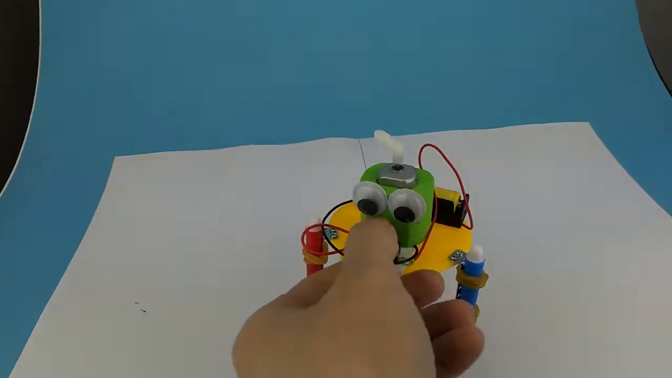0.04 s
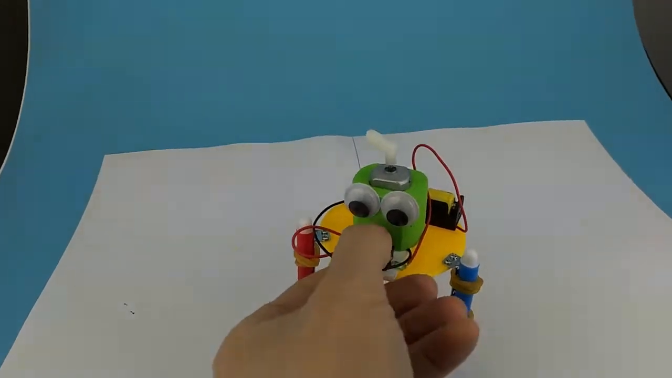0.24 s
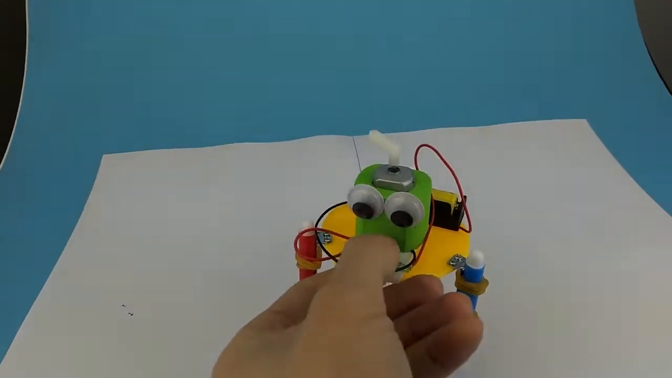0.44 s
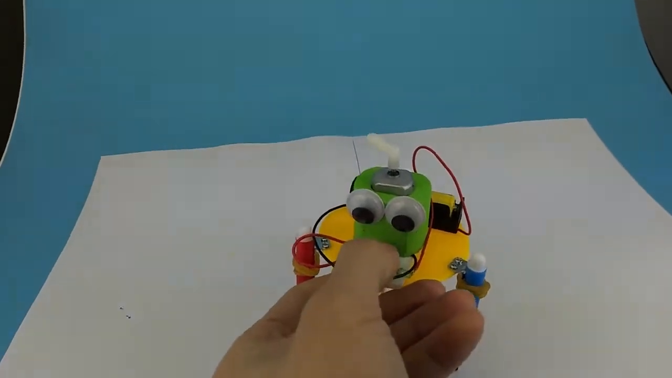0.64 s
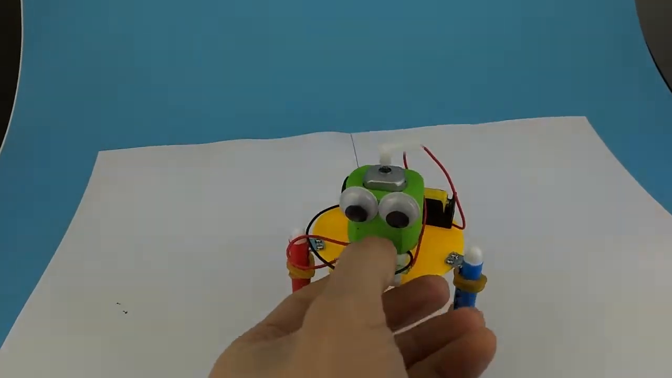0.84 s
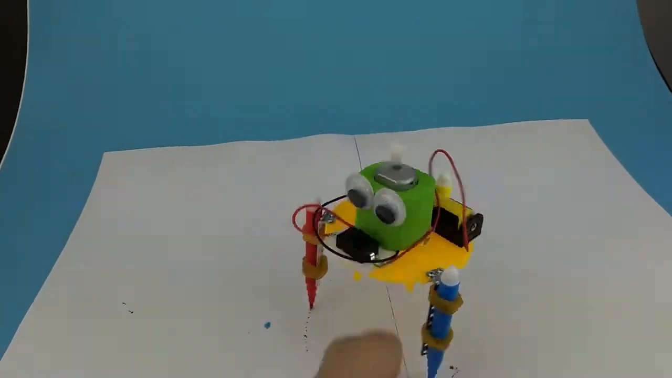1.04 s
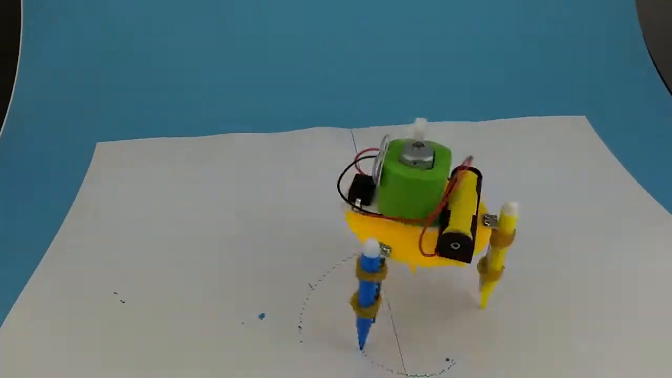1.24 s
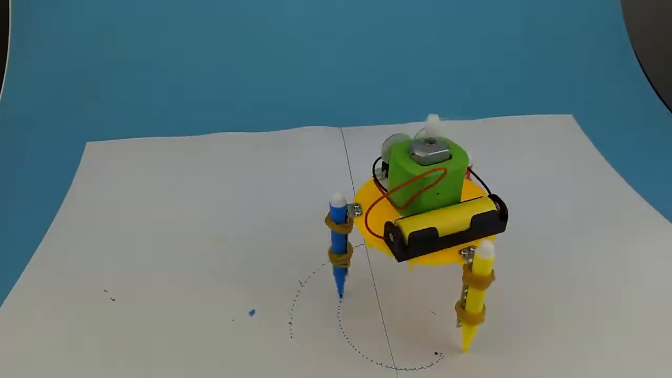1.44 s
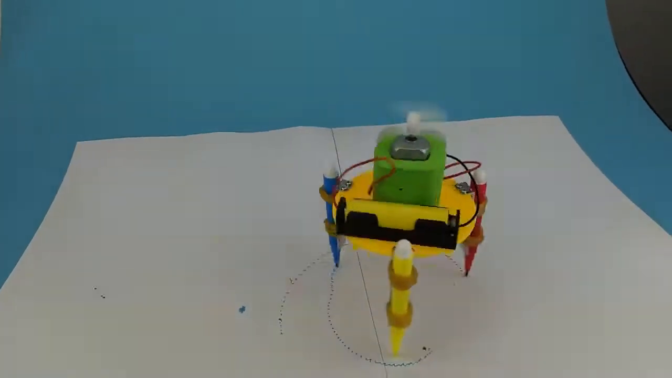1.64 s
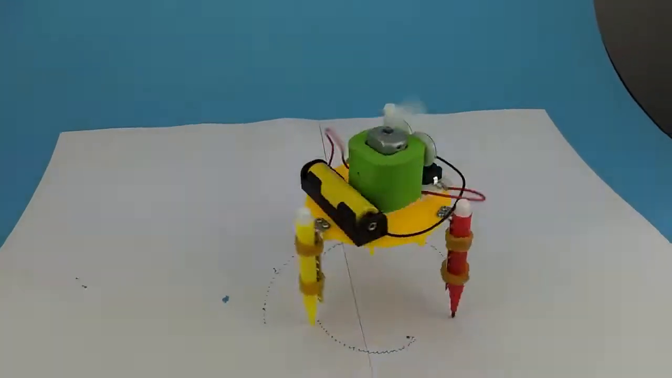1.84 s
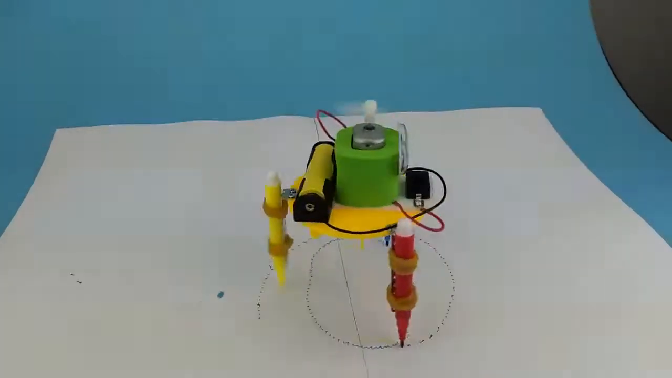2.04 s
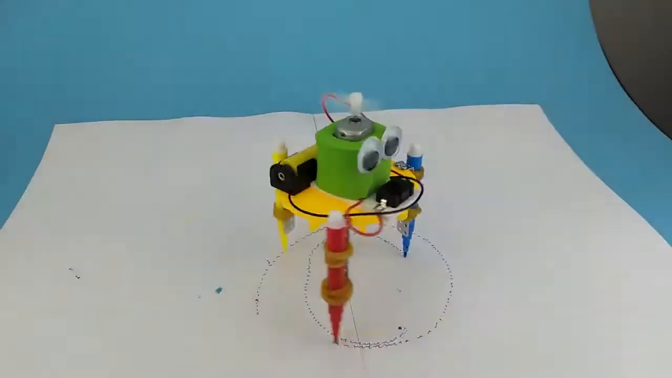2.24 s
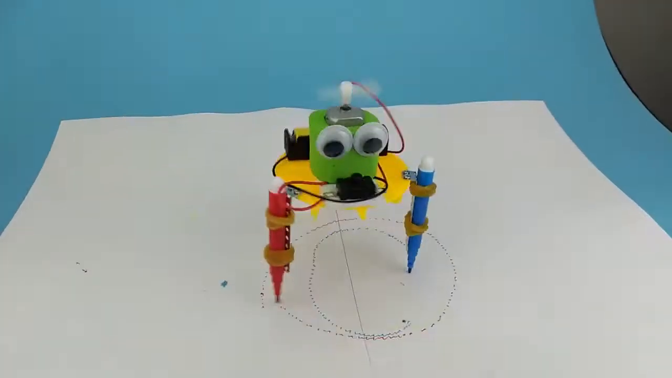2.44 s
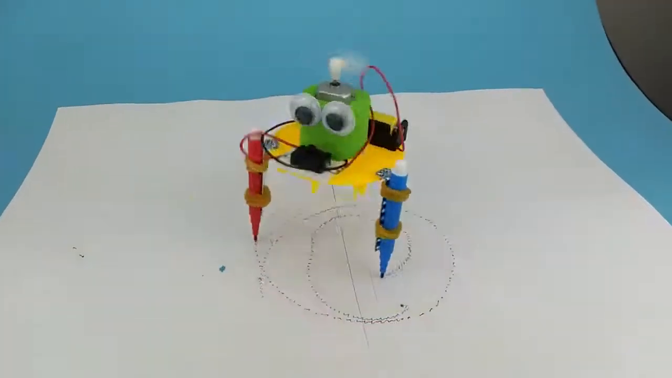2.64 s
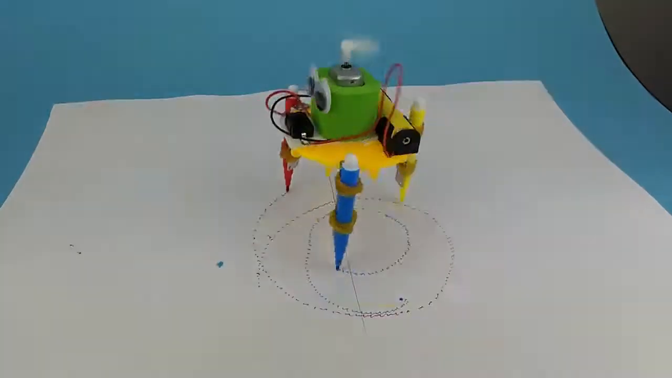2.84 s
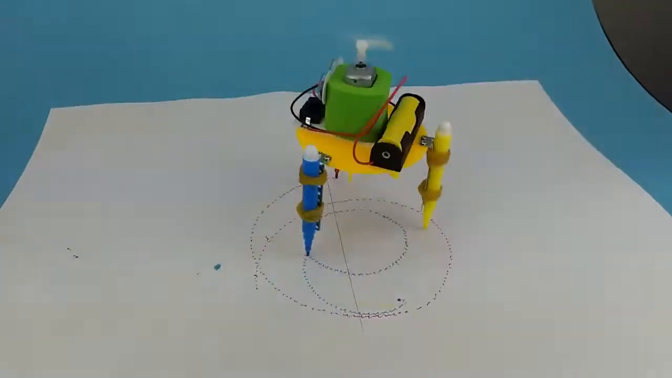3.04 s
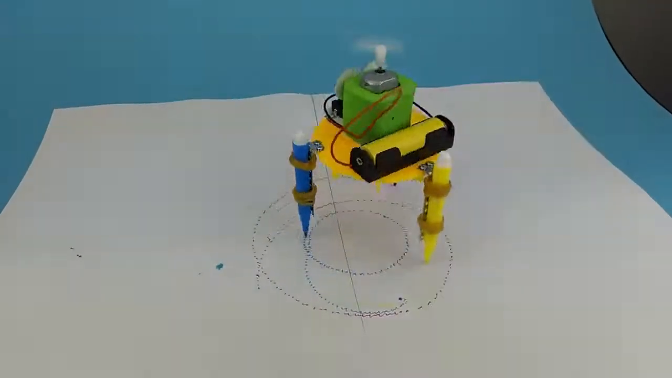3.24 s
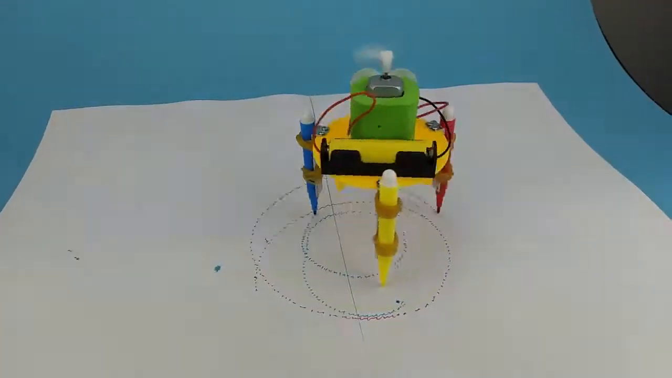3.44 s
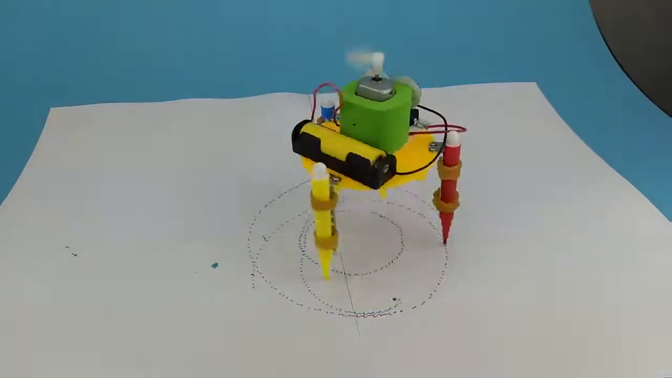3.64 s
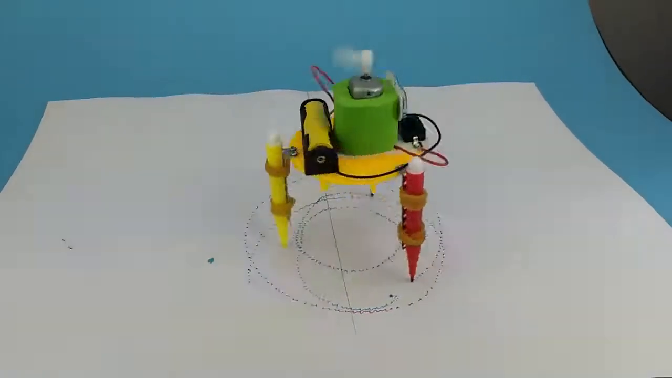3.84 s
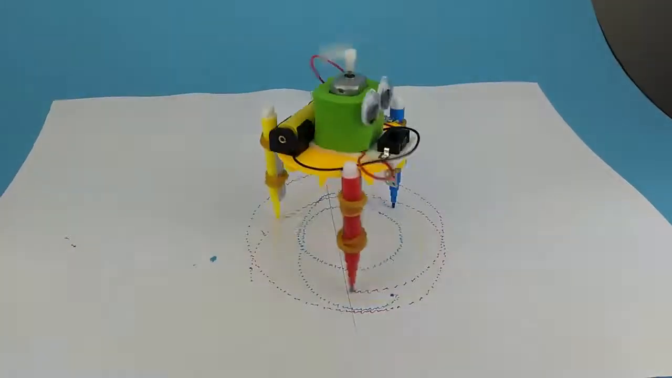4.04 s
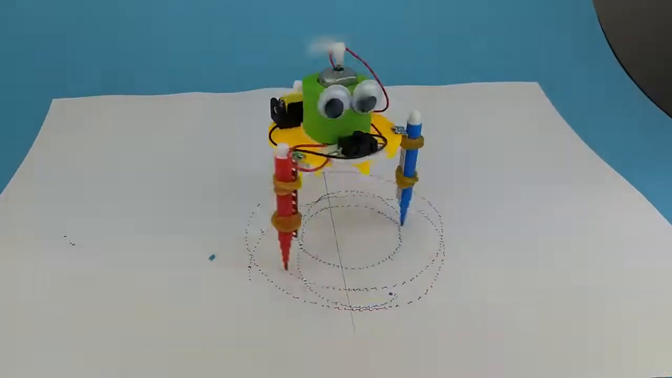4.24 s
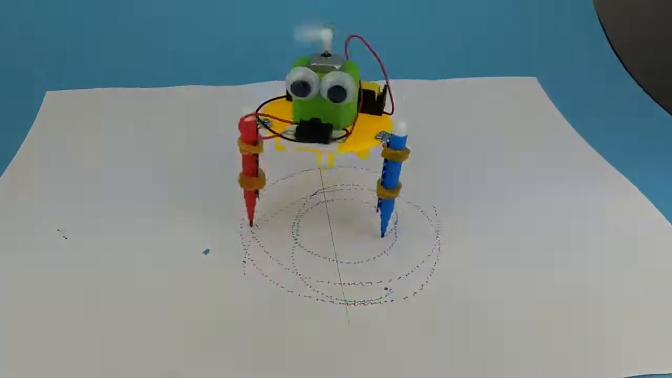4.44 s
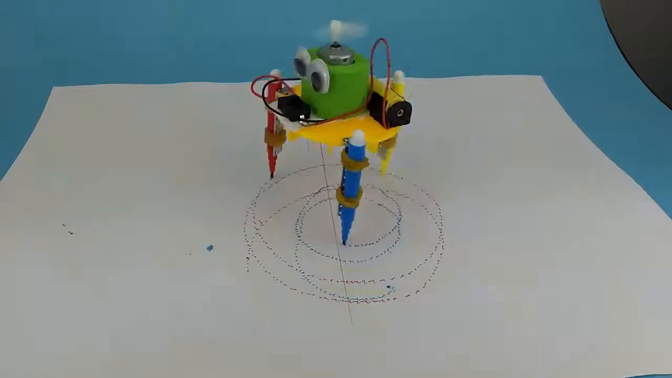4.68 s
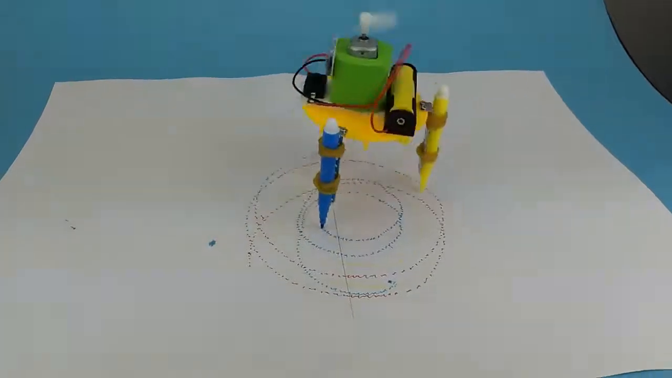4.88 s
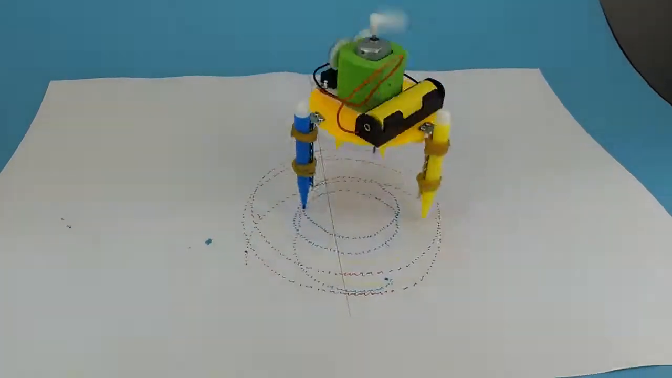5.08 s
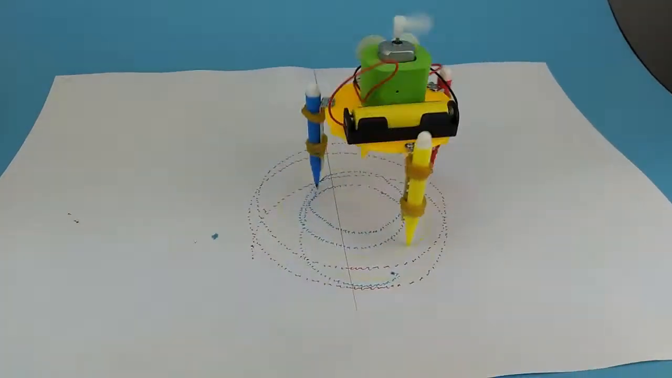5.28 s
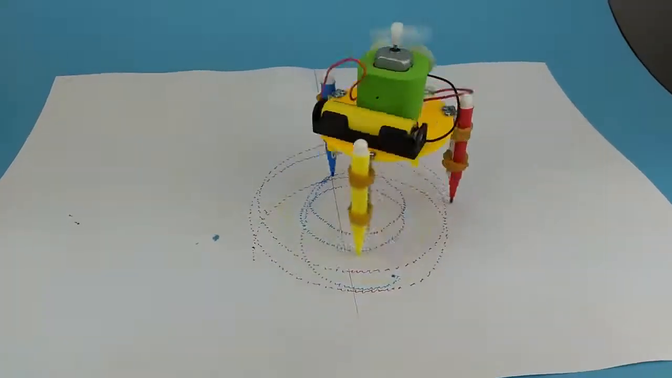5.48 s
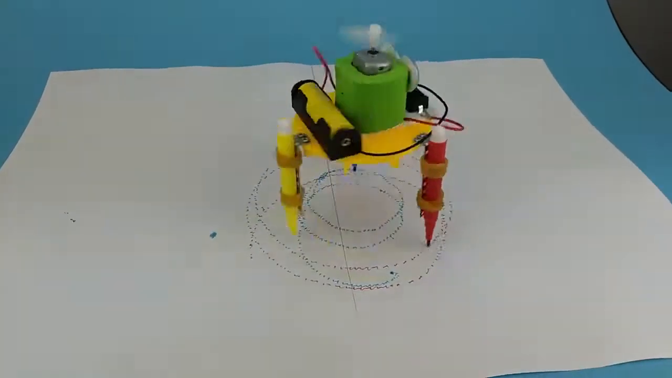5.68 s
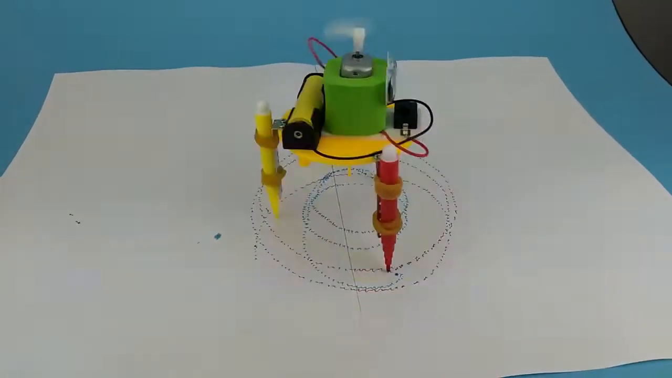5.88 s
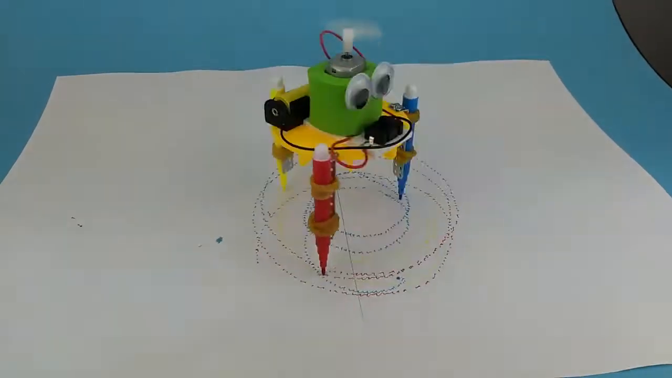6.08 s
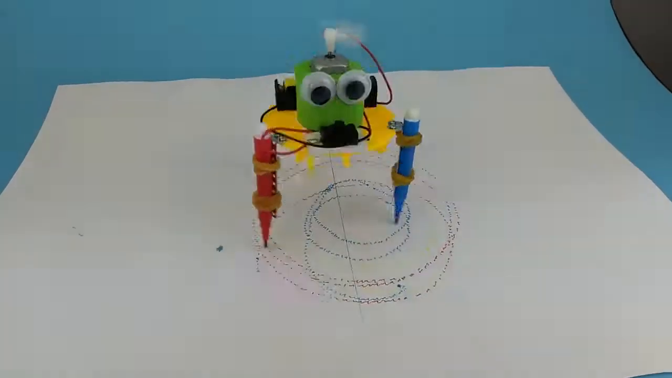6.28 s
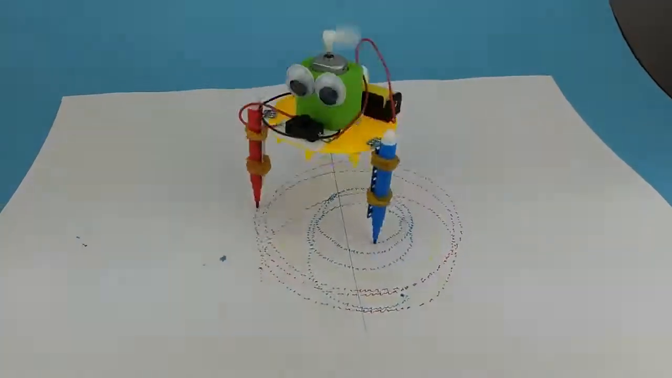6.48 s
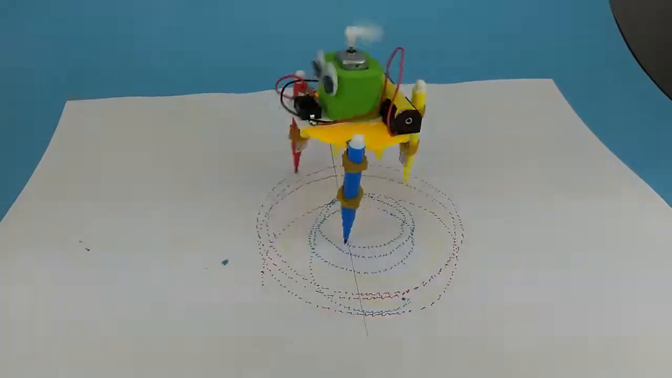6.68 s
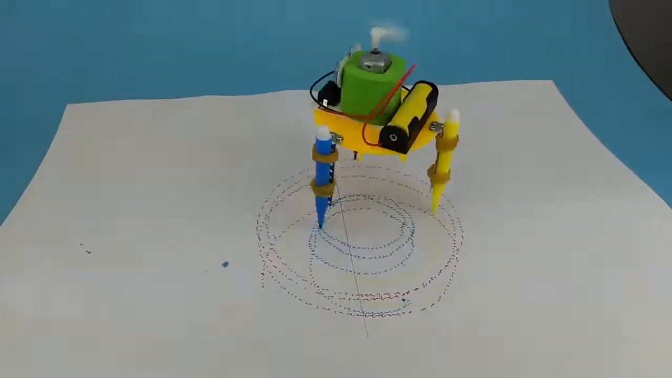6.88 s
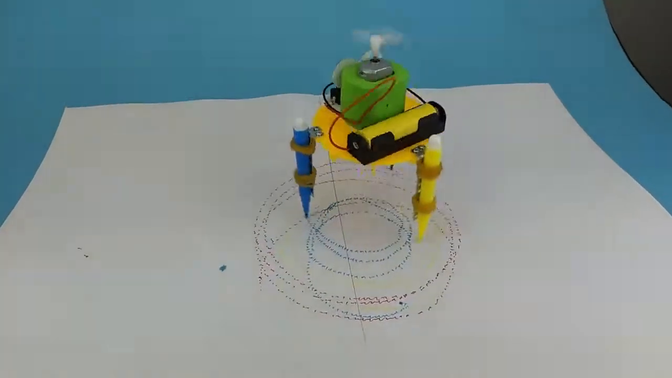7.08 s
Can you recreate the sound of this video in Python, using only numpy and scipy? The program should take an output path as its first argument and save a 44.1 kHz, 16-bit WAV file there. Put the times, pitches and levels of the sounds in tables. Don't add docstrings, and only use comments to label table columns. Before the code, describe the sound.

Close to a phone microphone in a quiet room, fingers rub faintly over a plastic toy and paper. A hard switch click snaps, and a second, softer one follows shortly after. At once a small off-balance motor spins up, and its pen legs hop on the paper: low table drumming, quick tip knocks, bright clattering loose parts and a hissy whirr, continuing unevenly to the end.

```python
import sys
import numpy as np
from scipy import signal
from scipy.fft import rfft, irfft, next_fast_len
from scipy.io import wavfile
from scipy.ndimage import uniform_filter1d, map_coordinates

SR = 44100
rng = np.random.default_rng(int(sys.argv[2]) if len(sys.argv) > 2 else 0)


def ratio(d):
    e = np.asarray(d, float) / 20
    return 10 ** e


def master_out(mix):
    frames = np.transpose(np.atleast_2d(mix))
    ceiling = np.clip(frames, -1, 1)
    pcm = np.round(ceiling * 32767).astype(np.int16)
    wavfile.write(sys.argv[1], SR, pcm)


N = 313992
TIME_S = np.arange(N) / SR


# start_s, turns_per_s
SHAFT = [(.88, 26.5), (1.05, 35.8), (1.6, 35.9), (2.5, 34.4), (3.4, 35.4), (4.3, 35.6), (5.4, 35),
         (6.2, 36), (7.12, 35.7)]
# mid_s, half_length_s, tip_knock_db, deep_drum_db
HOPS = [(.95, .09, -50, -42), (1.15, .07, -36, -48), (1.27, .05, -41, -47), (1.38, .09, -34.5, -44),
        (1.52, .1, -35, -38.5), (1.62, .06, -35, -42), (1.76, .06, -41, -46), (1.9, .11, -38.5, -39),
        (2.1, .06, -52, -43), (2.43, .08, -44, -44), (2.68, .13, -41.5, -45), (3, .14, -46, -43),
        (3.42, .11, -45, -40), (3.7, .11, -41, -52), (3.93, .08, -52, -44), (4.25, .12, -42, -42),
        (4.6, .14, -48, -45), (5.22, .12, -47, -43), (5.45, .08, -46, -43), (5.63, .1, -42.5, -52),
        (5.86, .07, -50, -41), (6.18, .1, -46, -43), (6.6, .08, -56, -48), (7, .1, -52, -49)]
# start_s, rattle_db, centre_hz, focus_on_centre_db
RUN = [(.9, -48, 3800, 25), (1.04, -39, 3800, 22), (1.5, -38.5, 3550, 28), (1.85, -41, 3400, 26),
       (2.05, -41, 4300, 14), (2.25, -40, 3900, 26), (2.55, -39.5, 3750, 24), (3.1, -41.5, 4200, 26),
       (4.1, -40, 3800, 26), (4.6, -39.5, 3850, 24), (4.75, -40, 4250, 20), (5.1, -41, 4050, 26),
       (5.5, -40, 3750, 28), (5.85, -41, 4050, 34), (7.12, -43, 4150, 34)]
# mid_s, half_length_s, level_db
FITS = [(1.17, .12, -37.5), (1.39, .05, -33.5), (1.53, .08, -35), (1.99, .04, -37), (2.08, .04, -36.5),
        (2.38, .11, -38), (2.59, .09, -35.5), (3.35, .105, -34.5), (3.57, .08, -38), (3.85, .1, -39),
        (4.21, .145, -36), (4.78, .08, -36.5), (5.43, .16, -38), (6.15, .2, -38), (6.47, .07, -39),
        (7.04, .04, -40)]
# start_s, whirr_db
SKID = [(.89, -52.5), (1.06, -40), (1.2, -39.5), (1.7, -43), (2.05, -42.5), (2.4, -44), (5.5, -45),
        (5.85, -48.5), (7.12, -49.5)]


def motor():
    turns = np.cumsum(curves(SHAFT)[0] * (1 + 0.00586 * wobble(12))) / SR
    mid_s, half_s, tip_db, deep_db = np.transpose(HOPS)
    tip_db = spells(mid_s, 1.2 * half_s, tip_db, rest_db=-52, order=2)
    deep_db = spells(mid_s, 1.3 * half_s, deep_db, rest_db=-49, order=2)
    shaken_db, centre_hz, focus_db = curves(RUN)
    chatter_db = wobble(36)
    chatter_db = 1.1 * (chatter_db - uniform_filter1d(chatter_db, size=SR // 8))
    rattle_db = spells(*np.transpose(FITS), shaken_db, order=8) + 0.9 + chatter_db
    whirr_db = curves(SKID)[0] + 0.4 * chatter_db
    since_start_s = TIME_S - SHAFT[0][0]
    going = np.clip(since_start_s / 0.03, 0, 1)
    hopping = np.clip(since_start_s / 0.08, 0, 1)
    legs = drumming(turns, tip_db, deep_db) + ratio(tip_db - 2.2) * tip_knocks(turns)
    loose = ratio(rattle_db - 2.5) * rattle(turns, centre_hz, focus_db)
    return going * (hopping * legs + loose + ratio(whirr_db + 3.5) * whirr())


# multiple_of_shaft, level_db
ORDER = [(2, -9), (3, 3), (4, -6.5), (5, -4), (7, -11.5)]
# pitch_hz, level_db (per Hz)
TABLE = [(30, -19.5), (48, -12), (68, -6), (85, -4.5), (105, -5), (122, -2), (140, -1.5), (190, 0),
         (225, -11), (253, -5.5), (285, -14.5), (340, -12.5), (450, -28.5), (800, -77.5)]


def drumming(turns, tip_db, deep_db):
    shake = 0
    for multiple, db in ORDER:
        unsteady = ratio(db + 2.2 * wobble(11))
        shake = shake + unsteady * np.sin(2 * np.pi * multiple * turns + 1.08 * wobble(8))
    thumps = landings(turns, per_turn=3, scatter=0.00281, spread_db=1)
    drum = ratio(-4.5) * unit(shake) + ratio(-2.0) * unit(coloured(thumps, TABLE))
    deep = signal.sosfiltfilt(signal.butter(3, 123, fs=SR, output="sos"), drum)
    upper_db = -43 + 0.35 * (tip_db + 46) - 0.3 * (deep_db + 46) + 0.8 * wobble(12)
    return ratio(deep_db) * unit(deep) + ratio(upper_db) * unit(drum - deep)


# pitch_hz, level_db (per Hz)
TIPS = [(100, -29), (200, -6.5), (330, 2), (520, -4), (680, -2.5), (800, -8.5), (1300, -10), (2500, -17),
        (5000, -75)]


def tip_knocks(turns):
    strikes = landings(turns, per_turn=2, scatter=0.0012, spread_db=2.5)
    offbeat = landings(turns + 0.3, per_turn=1, scatter=0.0006, spread_db=2)
    bounces = landings(turns, per_turn=7, scatter=0.003086, spread_db=2)
    return -unit(coloured(strikes + 0.7 * offbeat + 0.7 * bounces, TIPS))


def rattle(turns, centre_hz, focus_db):
    hits = landings(turns, per_turn=6, scatter=0.0011, spread_db=4.5)
    hits = hits + 0.5 * landings(turns, per_turn=13, scatter=0.003, spread_db=2.0)
    at = np.flatnonzero(hits)
    direct = frame(at, hits[at], centre_hz[at], spread_db=5.2, lean=focus_db[at])
    t = np.arange(SR // 20) / SR
    tail = rng.standard_normal(len(t)) * ratio(-60 * t / 0.076) * (t > 0.0015)
    echo = signal.fftconvolve(direct, tail / np.linalg.norm(tail))[:N]
    return unit(direct + ratio(-12.5) * echo)


# start_s, peak_db, ring_hz
KNOCKS = [(1.4037, -20, 3730), (1.4686, -20, 3420), (2.0308, -20, 4330), (2.1096, -19, 3140),
          (2.4074, -21, 3790), (2.6115, -19, 4140), (2.7661, -23, 4470), (2.8749, -25, 4370),
          (3.1557, -21, 4750), (3.256, -20, 4230), (3.2634, -20, 4030), (3.5199, -18, 4770),
          (3.7369, -19, 4310), (3.7998, -20, 4290), (3.9304, -20, 3800), (4.0741, -19, 3830),
          (4.1834, -20, 3870), (4.2193, -20, 4270), (4.7127, -19, 4470), (5.035, -21, 4330),
          (5.1951, -22, 4800), (5.3872, -21, 3800), (5.4655, -21, 3470), (5.5603, -23, 3840),
          (5.8765, -23, 4120), (6.0372, -22, 3800), (6.112, -23, 3820), (6.1913, -24, 4260),
          (6.2292, -23, 3960), (6.4492, -22, 4170)]


def knocks():
    start_s, peak_db, ring_hz = np.transpose(KNOCKS)
    at = (start_s * SR + 12).astype(int)
    return frame(at, ratio(peak_db + 23), ring_hz, spread_db=1.5, lean=28)


# pitch_hz, width_hz, level_db
FRAME = [(3240, 470, 2), (3900, 600, 0), (4500, 530, 2), (4950, 290, 3.5), (5900, 2000, 3.5)]


def frame(at, size, lean_hz, spread_db, lean):
    m = next_fast_len(N + 4096)
    f, out = np.fft.rfftfreq(m, 1 / SR), 0
    luck = rng.standard_normal((6000, len(FRAME)))[:len(at)]
    for k, (hz, width, db) in enumerate(FRAME):
        mix_db = db + spread_db * np.clip(luck[:, k], -2, 1) - lean * np.abs(np.log(hz / lean_hz))
        blows = np.bincount(at, (-1) ** k * size * ratio(mix_db), N)
        mode = 1j * f * width / (hz ** 2 - f ** 2 + 1j * f * width)
        out = out + rfft(blows, m) * mode * 1j * f / (hz / 2 + 1j * f)
    u = 1j * f / 2900
    radiation = u ** 2 / (1 + 0.89 * u + u ** 2)
    u = 1j * f / 5600
    contact = 1 / (1 + 1.25 * u + u ** 2) / (1 + 0.62 * u)
    return irfft(out * radiation * contact, m)[:N]


# pitch_hz, level_db (per Hz)
WHIRR = [(290, -23), (500, 1), (658, -7.5), (824, -10), (1150, -8), (1520, -10), (2240, -6.5), (4290, -5),
         (5370, -6), (6390, -3.5), (8110, -11), (9190, -6), (9900, -17), (12900, -48.5), (21800, -120)]


def whirr():
    grain = rng.standard_normal(N) * ratio(1.48 * wobble(150) + 0.81 * wobble(20))
    z = signal.stft(unit(coloured(grain, WHIRR)), nperseg=512)[2]
    patches = uniform_filter1d(rng.standard_normal(z.shape), 4, 0)
    patches = uniform_filter1d(patches, 5, 1)
    return unit(signal.istft(z * ratio(2.1 * unit(patches)), nperseg=512)[1][:N])


# start_s, peak_db, crack_db, ring_db, ring_hz
SWITCH = [
    (0.6059, -8.8, 1.5, -22, 4900),
    (.8455, -37, 0, -4, 4870),
    (.8699, -15, -3.5, -6.5, 4520),
]
# pitch_hz, level_db, t60_s
CASE = [(3530, -10.5, 0.12), (4490, 2, 0.028), (5030, 6.5, 0.031), (5540, -8, 0.045), (6200, 10.5, 0.03),
        (7950, -28, 0.052), (7960, -33.5, 0.024), (9400, -33.5, 0.058)]
# pitch_hz, level_db (per Hz)
SNAP = [(350, -60), (800, -32.5), (1080, -10.5), (1600, -9), (2300, -7), (3500, 2), (5000, 0.5), (6200, 0),
        (7000, -10.5), (9200, -7.5), (9800, -24.5), (12700, -58)]


def switch():
    cracks, rings = np.zeros(N + SR), np.zeros(N + SR)
    t = np.arange(SR // 8) / SR
    for start_s, peak_db, crack_db, ring_db, ring_hz in SWITCH:
        crack = ratio(-60 * t / 0.0081) * rng.standard_normal(len(t)) * (1 - np.exp(-t / 0.00011))
        crack[6] -= 4.5
        echo = ratio(-13 - 60 * t / 0.062) * rng.standard_normal(len(t)) * (1 - np.exp(-(t / 0.003) ** 2))
        case = 0
        for hz, db, t60 in CASE:
            decay = ratio(db + rng.normal(0, 1.5) - 60 * t / t60)
            case = case + decay * np.sin(2 * np.pi * hz * t)
        slider = 0.8 * np.sin(2 * np.pi * 3700 * t)
        body = ratio(-60 * t / 0.011) * (np.sin(2 * np.pi * ring_hz * t) + slider)
        ring = (ratio(-25) * case + ratio(ring_db) * body) * (1 - np.exp(-t / 0.0003))
        i = round(start_s * SR) + 25
        cracks[i:i + len(t)] += ratio(peak_db + crack_db) * (crack + echo)
        rings[i:i + len(t)] += ratio(peak_db) * ring
    return coloured(cracks[:N], SNAP) + rings[:N]


# peak_s, fumble_db, rustle_db, rise_s, fall_s (times for 20 dB)
HAND = [(.012, -48, -52, .05, .03), (.04, -70, -52, .2, .12), (.2, -64, -66, .5, .5),
        (.098, -50, -55, .05, .015), (.31, -53, -60, .04, .3), (.41, -44, -60, .2, .012),
        (.474, -56, -66, .07, .03), (.63, -44, -53.5, .02, .07), (.746, -62, -56, .06, .1),
        (.784, -47.5, -66, .05, .035), (.875, -42, -52, .09, .025), (.96, -47, -43, .05, .3)]
# mid_s, level_db, length_s
SLIPS = [
    (0.106, -56, .008),
    (0.45, -53, .006),
    (.497, -51.5, 0.0089),
    (0.677, -52.5, .003),
    (0.742, -51.5, 0.018),
]
# pitch_hz, level_db (per Hz)
FUMBLE = [(59, -51), (100, -12.5), (252, -4), (356, -4.5), (491, -6), (623, -14), (692, -16), (1200, -22),
          (1560, -63), (2640, -120)]
# pitch_hz, level_db (per Hz)
RUSTLE = [(300, -27.5), (600, -8.5), (1500, -9), (2500, -7.5), (5000, -9.5), (9500, -21.5), (12000, -60)]


def hand():
    peak_s, fumble_db, rustle_db, rise_s, fall_s = np.transpose(HAND)[..., None]
    late_s = np.arange(2 * SR) / SR - peak_s
    off_db = -20 * np.maximum(-late_s / rise_s, late_s / fall_s)
    fumbling = ratio(-70) + np.resize(ratio(fumble_db + off_db).max(axis=0), N)
    rustling = ratio(-70.5) + np.resize(ratio(rustle_db + off_db).max(axis=0), N)
    fumble = unit(coloured(rng.standard_normal(N) * ratio(1.5 * wobble(60.34)), FUMBLE))
    rustle = unit(coloured(rng.standard_normal(N) * ratio(0.82 * wobble(36)), RUSTLE))
    slip = sum(ratio(db) * np.exp(-((TIME_S - s) / length) ** 2) for s, db, length in SLIPS)
    skin = unit(coloured(rng.standard_normal(N), SNAP))
    letting_go = np.clip((1.02 - TIME_S) / 0.15, 0, 1)
    return letting_go * (fumbling * fumble + ratio(5.0) * rustling * rustle + slip * skin + whine())


# start_s, level_db
WHINE = [(.4, -67), (.44, -62), (.5, -64), (.56, -58.5), (.6, -65), (.7, -80), (.82, -69), (.9, -80)]


def whine():
    level_db = curves(WHINE)[0] + 2.5 * wobble(30)
    return ratio(level_db) * np.sqrt(2) * np.sin(2 * np.pi * 2331 * TIME_S + 0.4 * wobble(12))


# pitch_hz, level_db (per Hz)
OPENING = [(180, -56), (300, -28), (459, -23), (529, -3), (649, -18), (735, -2.5), (959, -6), (2500, -21.5),
           (3250, -42), (5500, -120)]


def opening_rub():
    return ratio(-40 - 60 * TIME_S / 0.27) * unit(coloured(rng.standard_normal(N), OPENING))


# pitch_hz, level_db (per Hz)
ROOM = [(15, -13.5), (28, -4.5), (45, -4), (70, -1.5), (160, -3), (216, -1.5), (400, -15), (520, -44),
        (880, -120)]


def room():
    return ratio(-60) * unit(coloured(rng.standard_normal(N), ROOM))


def unit(x):
    return x / np.sqrt(np.mean(x ** 2) + 1e-20)


def along(points, hz):
    f, v = np.transpose(points)
    return np.interp(np.log(hz + 1), np.log(f + 1), v)


def curves(rows):
    s, *cols = np.transpose(rows)
    return [np.interp(TIME_S, s, c) for c in cols]


def wobble(rate):
    knots = rng.standard_normal(int(N * rate / SR) + 4)
    return map_coordinates(knots, [np.arange(N) * rate / SR])


def coloured(x, spectrum):
    m = 2 * next_fast_len(N // 2 + 4096)
    gain = ratio(along(spectrum, np.fft.rfftfreq(m, 1 / SR)))
    ceps = irfft(np.log(gain + 1e-6), m)
    ceps[1:m // 2] *= 2
    ceps[m // 2 + 1:] = 0
    return irfft(rfft(x, m) * np.exp(rfft(ceps)), m)[:N]


def landings(turns, per_turn, scatter, spread_db):
    at = np.flatnonzero(np.diff(np.floor(turns * per_turn)))
    luck = rng.standard_normal((4000, 2))[:len(at)]
    at = np.clip(at + (luck[:, 0] * scatter * SR).astype(int), 0, N - 1)
    return np.bincount(at, ratio(spread_db * np.clip(luck[:, 1], -2.5, 1.3)), N)


def spells(mid_s, half_s, db, rest_db, order):
    t = np.arange(N // 100 + 2) * 100 / SR
    off = np.abs((t - mid_s[:, None]) / half_s[:, None])
    top_db = np.max(db[:, None] - 9 * off ** order, axis=0)
    return np.maximum(rest_db, np.interp(TIME_S, t, top_db))


def scene():
    mono = motor() + knocks() + switch() + hand() + opening_rub() + room()
    return np.tile(mono, (2, 1))


def top_cut(x):
    return signal.sosfilt(signal.butter(12, 10790, fs=SR, output="sos"), x)


def record(dry):
    m = next_fast_len(N + 4096)
    hz = np.fft.rfftfreq(m, 1 / SR)
    apart = ratio(-44) * ratio(11 * wobble(20)) * rng.standard_normal(N) * np.abs(dry[0])
    side = irfft(rfft(apart, m) * (hz > 4500), m)[:N]
    response = (hz < 9800) * hz ** 2 / (hz ** 2 + 25 ** 2)
    mix = irfft(rfft(dry + [side, -side], m) * response, m)[:, :N]
    return top_cut(mix)


dry = scene()
out = record(dry)
master_out(out)
```